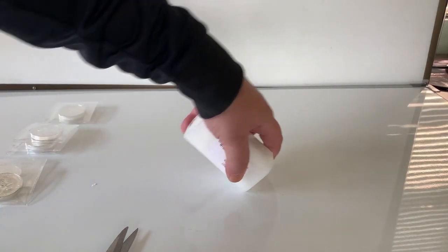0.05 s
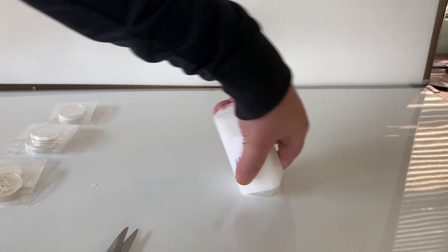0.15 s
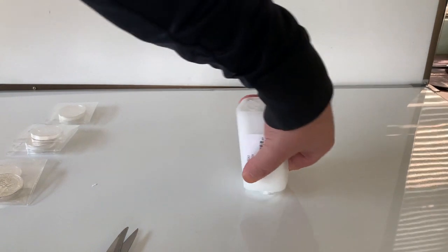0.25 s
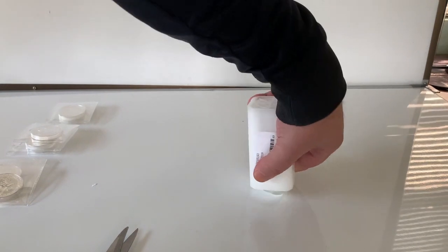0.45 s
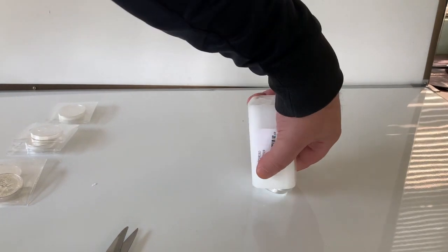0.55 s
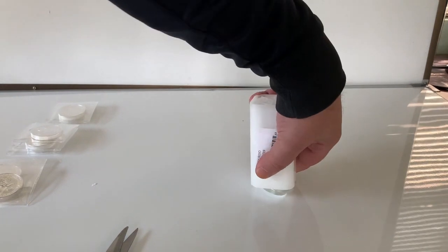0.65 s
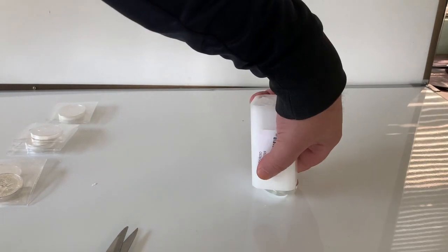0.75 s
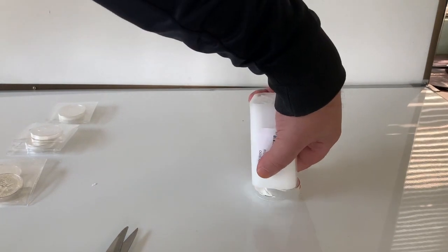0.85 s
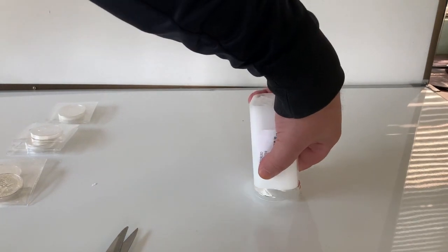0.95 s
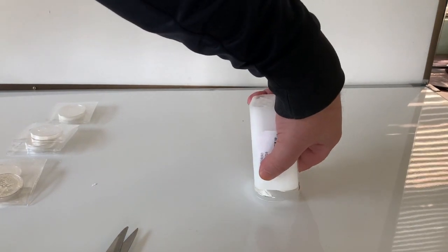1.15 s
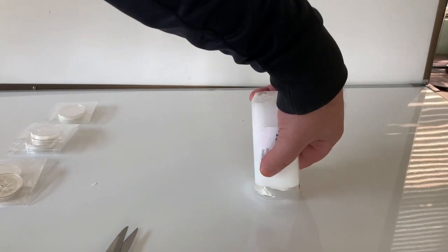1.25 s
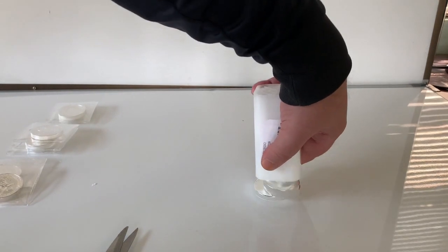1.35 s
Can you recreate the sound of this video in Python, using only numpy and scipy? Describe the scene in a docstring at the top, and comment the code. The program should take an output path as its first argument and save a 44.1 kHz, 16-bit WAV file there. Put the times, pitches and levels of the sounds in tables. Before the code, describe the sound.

A plastic tube of coins knocks twice on a hard table, coins clacking and sliding inside.

```python
"""Over a low hum in a small bare room, coins tick and slide in a plastic tube as it is tipped upright.
At 0.23 s it lands on a hard table in a quick cluster of blows: table and tube knock, the coins
clack and ring near 9 kHz, the room answers. Lifted a little, it lands again at 0.92 s.
The coins then slide and tick as the hand shifts its grip; its presses make a dull rumble."""
import sys
import numpy as np
from scipy import signal
from scipy.fft import rfft, irfft
from scipy.io import wavfile

SR = 44100
rng = np.random.default_rng(int(sys.argv[2]) if len(sys.argv) > 2 else 0)


def waveform_to_disk(signal):
    """Save audio, clipped to [-1, 1], as 16-bit WAV at the path in sys.argv[1]."""
    frames = np.transpose(np.atleast_2d(signal))
    scaled = np.clip(frames, -1, 1) * 32767
    samples = np.round(scaled).astype(np.int16)
    wavfile.write(sys.argv[1], SR, samples)


N = 61739

# blows of rim and coin stack: t/s, gain/dB for bass, hollow, middle, treble, coin ring
BLOWS = [(.2251, -4.5, -1.5, 1.5, 1.5, -9.5), (.2285, -20.5, -1.5, -6.5, -3, -7),
         (.2348, -0.5, 3, -10.5, 1.5, 0), (.2392, -26.5, -15, -29, -3.5, -5.5),
         (.2450, -42, -42, -22, -12.5, -12), (.2513, -12.5, -11, -13.5, -8, -23),
         (.9160, -44, -50, -3, -27, -10), (.9181, -19.5, -4.5, -18.5, 1, -42),
         (.9203, -10, -10.5, 3.5, -19.5, -7), (.9229, -0.5, -12.5, -29.5, 2, -35),
         (.9272, -5, -12, -25.5, -33, -33), (.9388, -4.5, -15, -21, -15, -24)]
# ticks of coins and fingers on the tube: t/s, gain/dB for bass, middle, treble, coin ring
TICKS = [(0.0487, -27, -29.5, -54, -41), (0.1113, -33, -18.5, -50.5, -57), (0.1192, -27.5, -19.5, -29, -34),
         (0.1601, -14, -22, -11.5, -16), (0.17, -54, -11.5, -44, -18), (0.185, -43, -13.5, -45, -36),
         (0.5915, -51, -39, -59, -58), (0.6799, -17.5, -32.5, -40, -53), (0.6824, -37.5, -23, -34.5, -56),
         (0.869, -32, -24.5, -34, -57), (0.8791, -19, -21.5, -32, -43), (0.8987, -30, -17.5, -32, -26),
         (1.1635, -40, -24, -29, -32.5), (1.2122, -21, -30, -52, -53), (1.2190, -37, -24.5, -33, -58),
         (1.2320, -45, -27, -30, -52), (1.237, -39, -26.5, -39, -49), (1.3206, -35, -29, -40.5, -57.5),
         (1.388, -28, -28, -36, -34), (1.3955, -61, -21.5, -32, -38.5)]
# slides of coins in tube, rim on table: t/s, length/s, gain/dB for bass, middle, treble, coin ring
SLIDES = [(0.114, 0.057, -20.5, -17, -24, -23), (0.151, 0.089, -14.5, -11.5, -11.5, -30),
          (0.582, 0.043, -21, -37, -51, -51), (0.871, 0.063, -8, -9.5, -38, -32.5),
          (0.932, 0.1, -15.5, -10.5, -19.5, -54), (1.203, 0.066, -41, -22.5, -43, -58)]
# table and tube modes: f/Hz, level/dB, t60/s
BODY_MODES = [(86.4, -24, 0.37), (175, -26, 0.136), (293.8, -26.5, 0.23), (350, -22.5, 0.12),
              (423.7, -25.5, 0.09), (572, -27, 0.083), (702, -15.5, 0.052), (766, -17, 0.039),
              (945, -20.5, 0.066), (1220, -23.5, 0.023), (1346.5, -23.5, .05), (1831, -21, 0.04),
              (2894, -25, 0.03), (3350, -19.5, 0.017)]
# coin modes: f/Hz, level/dB, t60/s
COIN_MODES = [(8700, -16, 0.062), (8480, -33.5, 0.46), (8730, -33.5, 0.64), (9000, -34.5, 0.64),
              (8900, -39.5, 0.67), (9460, -37, .2), (9720, -23, .08), (10570, -31, 0.042),
              (14100, -25, 0.055)]
# tube wall tapped by a coin: f/Hz, level/dB, t60/s
WALL_MODES = [(1444, -25.5, 0.048), (1760, -43, .04), (3207, -20, 0.03), (3460, -26.5, 0.02),
              (4810, -26.5, 0.026)]
# contact crack spectrum: f/Hz, gain/dB
CRACK_EQ = [(60, -9), (300, 4), (800, 12), (2000, 6), (4000, 5.5), (5200, 4), (7300, -4), (8700, 2.5),
            (10300, 5.5), (11800, -9.5), (14500, -2), (16000, -16)]
# wall resonances favoured by light contacts: f/Hz, gain/dB
RATTLE_EQ = [(100, -3.5), (300, 1), (520, -3.5), (850, -8), (1350, 2), (1750, -0.5), (2300, -3), (3300, 0),
             (4200, -0.5), (5000, 0), (7000, 4), (10000, -2.5), (12000, -4), (15500, -5)]
# hand pressing tube and table: t/s, length/s, level/dB
PRESSES = [(0.134, 0.17, -44.5), (0.69, 0.132, -42.5), (0.951, 0.155, -42.5), (1.192, 0.073, -41.5)]
# hand rumble spectrum: f/Hz, relative level/dB
RUMBLE_EQ = [(30, -14), (60, -3.5), (95, 7.5), (130, -0.5), (180, -1), (230, -11), (320, -0.5),
             (430, -13.5), (700, -37.5), (2000, -55)]
# near reflections: f/Hz, level/dB, t60/s
NEAR_ECHOES = [(80, -7.5, 0.055), (293.5, -4.5, 0.39), (1000, -6, 0.069), (2860, -4, 0.15),
               (9000, -3, 0.051), (14400, 4.5, 0.022)]
# room tail: f/Hz, level/dB, t60/s
ROOM_TAIL = [(80, -10.5, .4), (315, -6, 0.35), (694, -7, 1), (1070, -11.5, 0.99), (2200, -10.5, 0.95),
             (4700, -12.5, 0.91), (7320, -9.5, 0.61), (9000, -14, 0.57), (11760, -7, 0.36),
             (15700, -8.5, 0.43)]
# left-right likeness of diffuse sound: f/Hz, coherence (-1 to 1)
COHERENCE = [(60, .95), (130, 0.78), (290, 0.83), (640, -0.1), (3100, 0.056), (15000, 0.039)]
# room noise spectrum: f/Hz, relative level/dB
ROOM_NOISE_EQ = [(25, -13), (55, -0.5), (100, 1), (140, 0.5), (330, -5.5), (500, -8.5), (900, -13),
                 (2000, -23.5), (4000, -27.5), (8000, -44), (15000, -51)]
# hum lines: f/Hz, level/dB
HUM_LINES = [(99, -52.5), (175, -59), (300, -62.5), (351, -76)]

BLOW_BANDS_HZ, LIGHT_BANDS_HZ = (330, 760, 2200, 9300), (330, 2200, 9300)
FREQS_HZ = np.fft.rfftfreq(N, 1 / SR)


def tube():
    """Blows, ticks and slides ring the same table, tube and coins. Returns hard and light contacts."""
    hard, light = np.zeros((2, 2, N))
    for start_s, *gains_db, coin_db in BLOWS:
        add(hard, start_s, contact(BLOW_BANDS_HZ, gains_db, coin_db, crack_s=0.0017))
    for start_s, bass_db, middle_db, treble_db, coin_db in TICKS:
        gains_db = (bass_db, middle_db, treble_db)
        tick = contact(LIGHT_BANDS_HZ, gains_db, coin_db, crack_s=0.0029, click_db=-5)
        add(light, start_s, amp(-3.5) * tick)
        add(light[0], start_s, amp(middle_db) * ring(WALL_MODES, detune=0.015))
    for start_s, length_s, *gains_db, coin_db in SLIDES:
        train = slips(length_s)
        slip = contact(LIGHT_BANDS_HZ, gains_db, coin_db, crack_s=0.00063)
        add(light, start_s, signal.fftconvolve(train[None], slip, axes=1))
    light = colour(light, RATTLE_EQ)[:, :N]
    low_cut = signal.butter(3, 69, "high", fs=SR)
    return signal.lfilter(*low_cut, np.array([hard, light]))


def contact(bands_hz, gains_db, coin_db, crack_s, crack_db=7.5, click_db=-7.5):
    """One touch. Row 0: knock of table and tube. Row 1: crack and ring of four coins."""
    t = np.arange(SR // 20) / SR
    crack = rng.standard_normal(len(t)) * np.exp(-t / crack_s)
    crack *= amp(crack_db) / np.linalg.norm(crack)
    crack[0] += amp(click_db)
    knock = ring(BODY_MODES, detune=0.012)
    rows = np.array([knock, np.zeros_like(knock)])
    add(rows[1], 0, colour(crack[None], CRACK_EQ)[0])
    sound = colour(rows, list(zip(bands_hz, gains_db)))
    add(sound[1], 0, amp(coin_db) * ring(COIN_MODES, detune=0.0086, count=4))
    return sound


def ring(modes, detune, count=1):
    """Decaying sines of one struck object, or of several nearly alike."""
    t = np.arange(SR // 3) / SR
    out = 0
    for hz, db, t60_s in modes:
        detuned_hz = hz * (1 + detune * rng.standard_normal((count, 1)))
        out = out + amp(db - 60 * t / t60_s) * np.sin(2 * np.pi * detuned_hz * t).sum(0)
    return out / np.sqrt(count)


def slips(length_s, rate_hz=2200, spread_db=4.5):
    """Sliding friction: tiny uneven impulses under an arch, unit energy."""
    samples = int(length_s * SR)
    chance, size, sign = rng.random((3, SR // 4))[:, :samples]
    strength = amp(-spread_db * np.log(size + 0.09))
    train = (chance < rate_hz / SR) * strength * np.sign(sign - 0.5)
    train *= np.sqrt(np.sin(np.pi * np.arange(samples) / samples))
    return train / (np.linalg.norm(train) + 1e-9)


def colour(x, eq, size=2048):
    """Minimum-phase filter on each row; eq is f/Hz, gain/dB."""
    log_gain = np.log(amp(lookup(eq, abs(np.fft.fftfreq(size, 1 / SR)))))
    response = np.exp(np.conj(signal.hilbert(log_gain)))
    taps = np.fft.ifft(response).real[:size // 2]
    return signal.fftconvolve(x, taps[None], axes=1)


def lookup(points, hz, column=1):
    """Table column interpolated over log frequency."""
    table = np.array(points, float)
    return np.interp(np.log(hz + 1), np.log(table[:, 0] + 1), table[:, column])


def add(mix, start_s, sound):
    part = mix[..., round(start_s * SR):][..., :sound.shape[-1]]
    part += sound[..., :part.shape[-1]]


def amp(db):
    return 10 ** (np.asarray(db) / 20)


def unit_rms(x):
    return x / np.sqrt(np.mean(x ** 2) + 1e-20)


def hand(ramp_s=0.02, fade_db=-3.5):
    """Each press starts a low rumble that eases off."""
    effort = np.zeros(N)
    for start_s, length_s, db in PRESSES:
        t = np.arange(0, length_s, 1 / SR)
        gate = np.minimum(np.minimum(t, length_s - t) / ramp_s, 1)
        add(effort, start_s, amp(db + fade_db * t / length_s) * gate)
    return effort * shaped_noise(RUMBLE_EQ)


def echoes(x, bands, rise_s):
    """Diffuse reflections: quick build-up, then each band decays at its own rate."""
    hz, t, spectra = signal.stft(diffuse_noise(), SR, nperseg=256)
    t60_s = lookup(bands, hz, column=2)[:, None]
    decay = amp(lookup(bands, hz)[:, None] - 60 * t / t60_s)
    energy_norm = np.sqrt(2 * np.log(1000) / (t60_s * SR))
    tail = signal.istft(spectra * decay * energy_norm, SR, nperseg=256)[1][:, :N]
    tail *= 1 - np.exp(-np.arange(N) / SR / rise_s)
    return signal.fftconvolve(x[None], tail, axes=1)[:, :N]


def diffuse_noise():
    """Stereo white noise, coherent in the bass."""
    left, independent = rfft(rng.standard_normal((2, N)))
    coherence = lookup(COHERENCE, FREQS_HZ)
    right = coherence * left + np.sqrt(1 - coherence ** 2) * independent
    return irfft(np.array([left, right]), N)


def shaped_noise(eq):
    """Diffuse noise with the given spectrum, unit RMS."""
    return unit_rms(irfft(rfft(diffuse_noise()) * amp(lookup(eq, FREQS_HZ)), N))


def room_noise(level_db=-48.5):
    """Dull, steady room background."""
    return amp(level_db) * shaped_noise(ROOM_NOISE_EQ)


def hum(waver_depth=0.2, waver_hz=3):
    """Low tones wavering in level and phase."""
    t = np.arange(N) / SR
    low_pass = np.exp(-(FREQS_HZ / waver_hz) ** 2)
    out = 0
    for hz, db in HUM_LINES:
        waver = waver_depth * unit_rms(irfft(rfft(rng.standard_normal((2, N))) * low_pass, N))
        phase = 2 * np.pi * (hz * t + rng.random())
        out = out + amp(db) * unit_rms((1 + waver[0]) * np.sin(phase) + waver[1] * np.cos(phase))
    return out


def scene(right_lag_s=3.9e-5):
    """Direct sound, earlier on the left and louder on the right, with the room around it."""
    hard, light = tube()
    source = (hard + light).sum(0)
    delayed = irfft(rfft(source) * np.exp(-2j * np.pi * FREQS_HZ * right_lag_s), N)
    direct = np.array([amp(-1) * source, amp(1) * delayed])
    knock, clack = hard + amp(3) * light  # room send: more of the light contacts, less knock
    room = echoes(amp(-6.5) * knock + clack, ROOM_TAIL, rise_s=0.004)
    near = echoes(source, NEAR_ECHOES, rise_s=0.0004)
    return direct + near + room + hand() + room_noise() + hum()


def record(dry, ceiling=0.9, cutoff_hz=16100):
    """Soft peak limit, then low-pass."""
    limited = dry / (1 + (abs(dry) / ceiling) ** 6) ** (1 / 6)
    taps = signal.firwin(301, cutoff_hz, window=("kaiser", 8), fs=SR)
    return signal.oaconvolve(limited, taps[None], "same")


dry = scene()
out = record(dry)
waveform_to_disk(out)
```